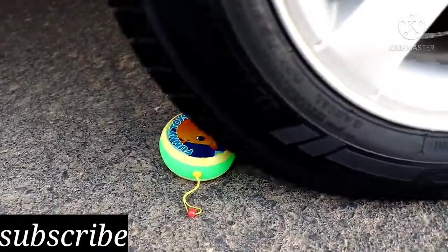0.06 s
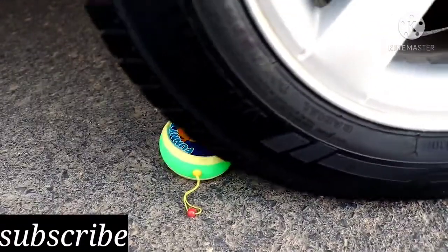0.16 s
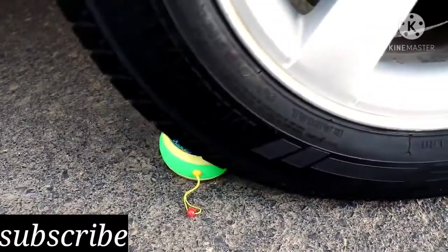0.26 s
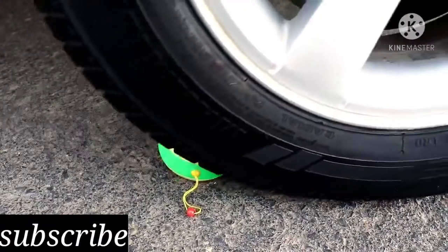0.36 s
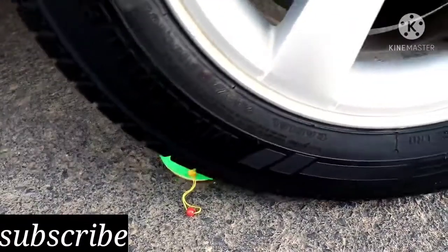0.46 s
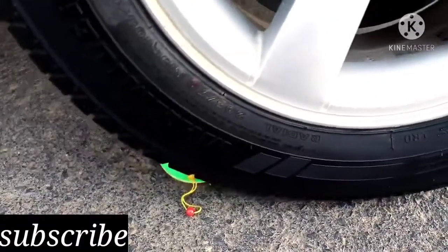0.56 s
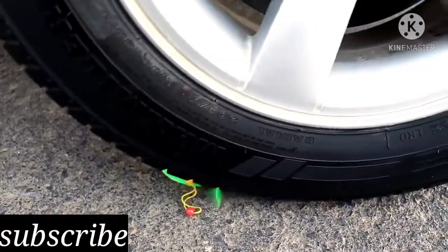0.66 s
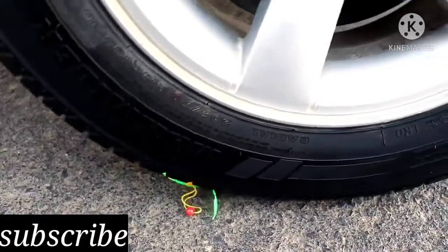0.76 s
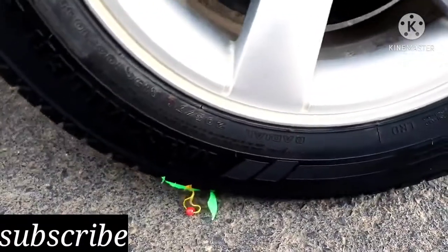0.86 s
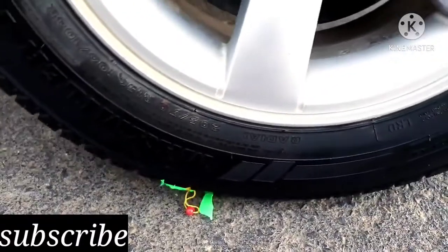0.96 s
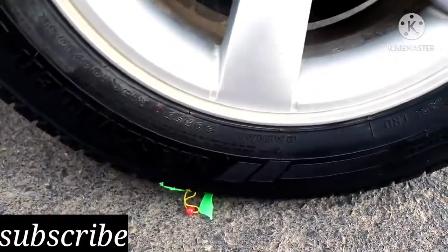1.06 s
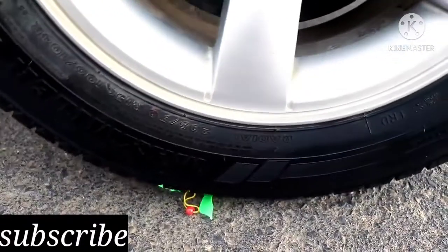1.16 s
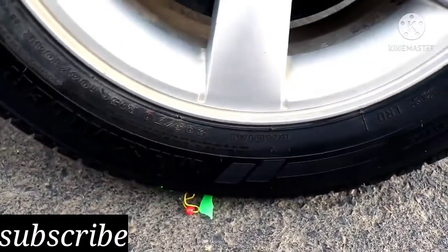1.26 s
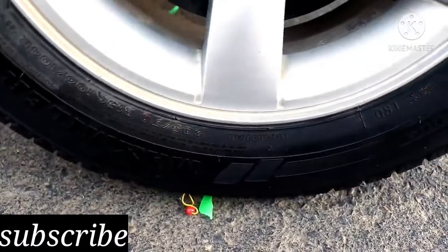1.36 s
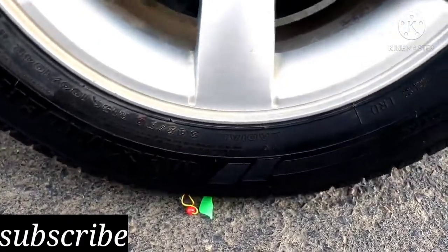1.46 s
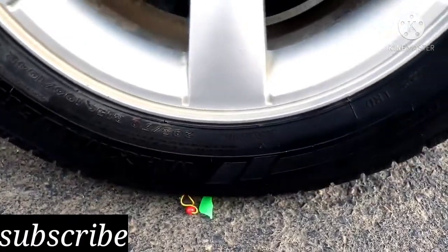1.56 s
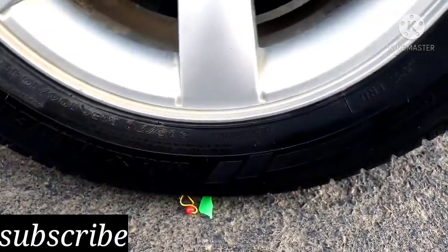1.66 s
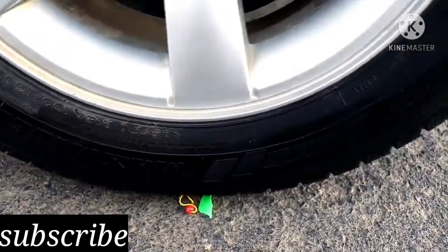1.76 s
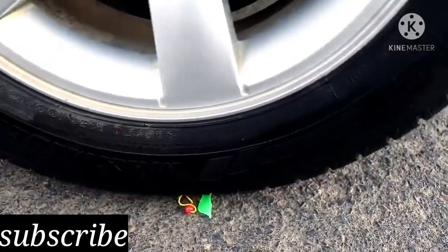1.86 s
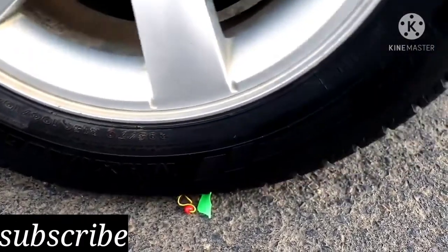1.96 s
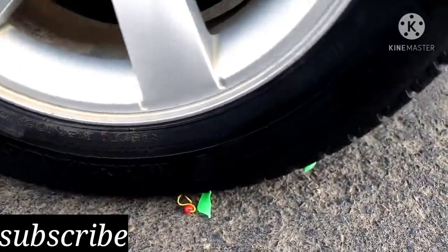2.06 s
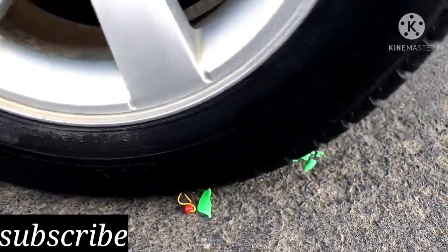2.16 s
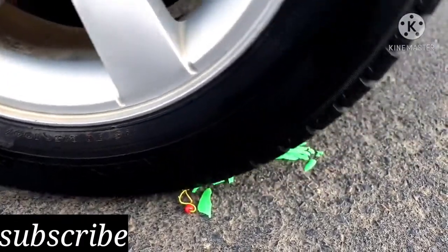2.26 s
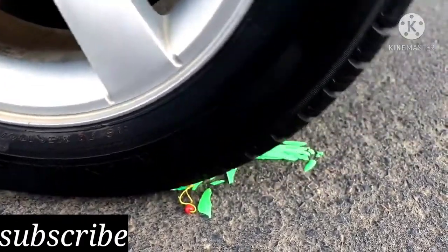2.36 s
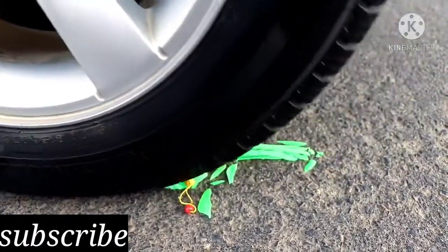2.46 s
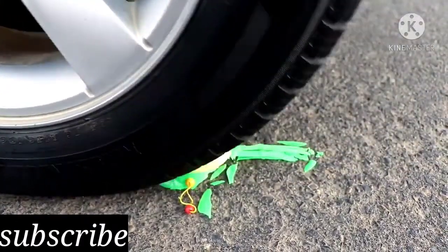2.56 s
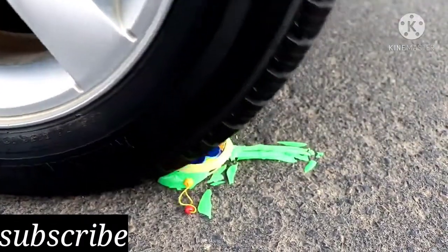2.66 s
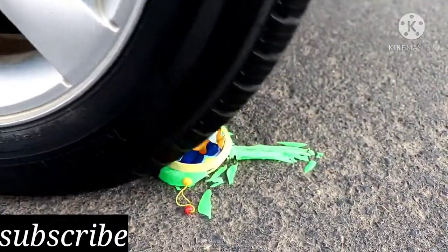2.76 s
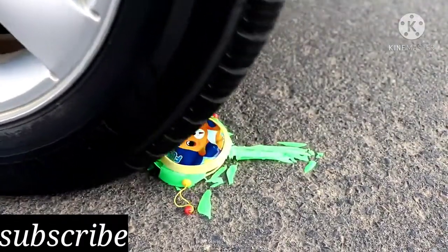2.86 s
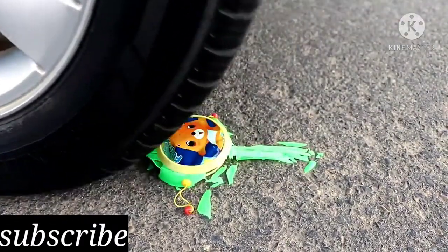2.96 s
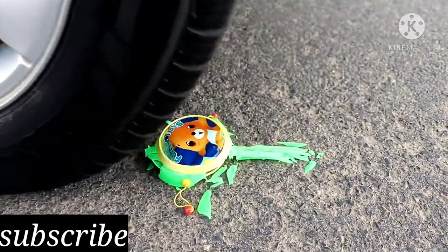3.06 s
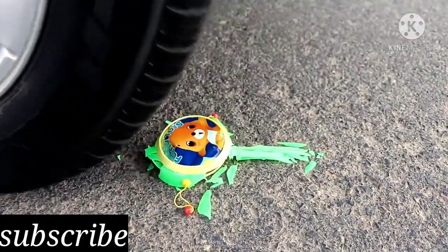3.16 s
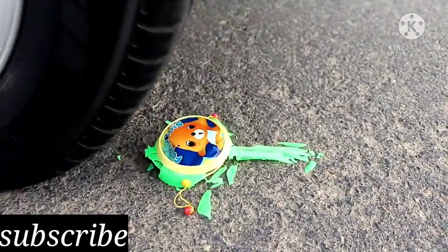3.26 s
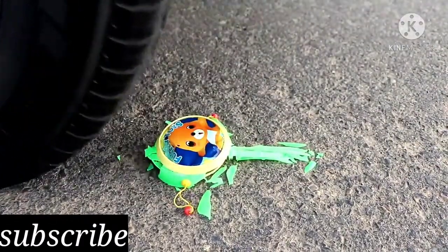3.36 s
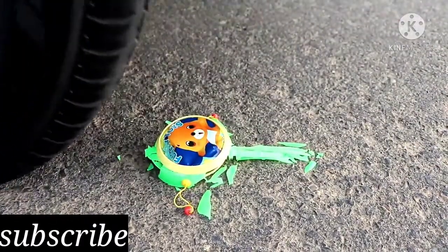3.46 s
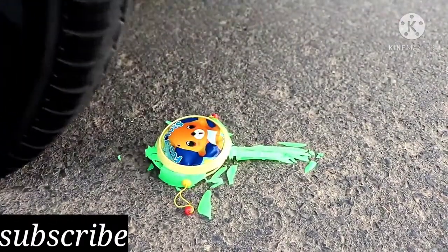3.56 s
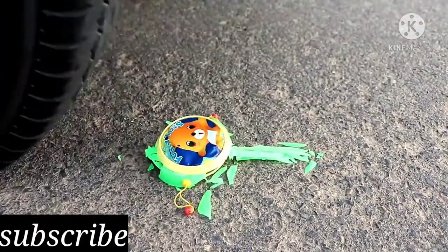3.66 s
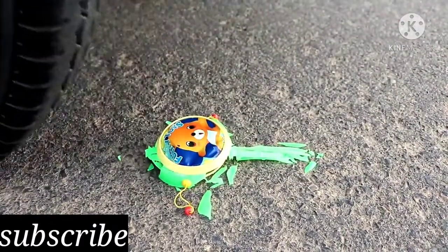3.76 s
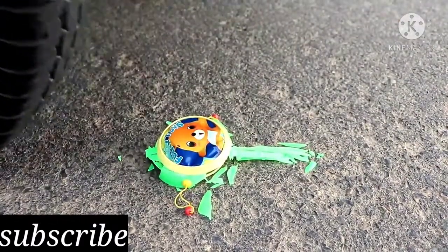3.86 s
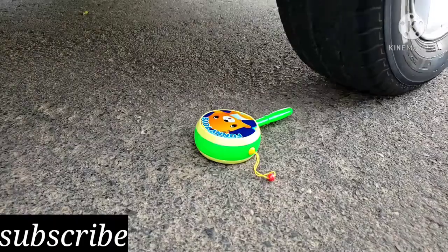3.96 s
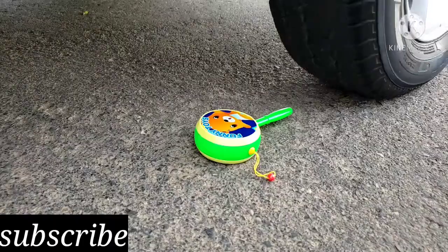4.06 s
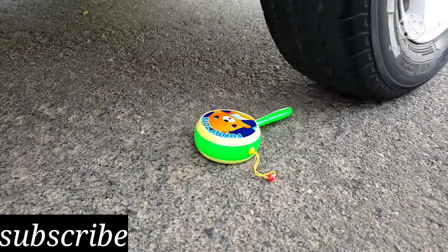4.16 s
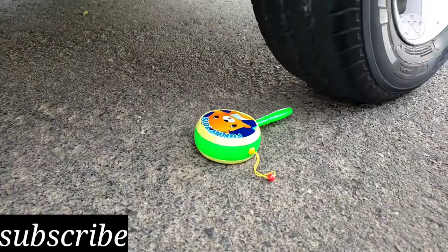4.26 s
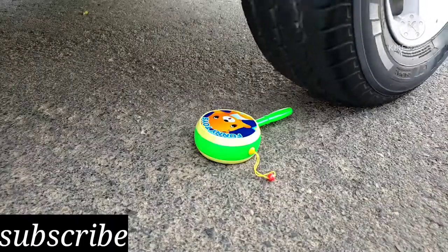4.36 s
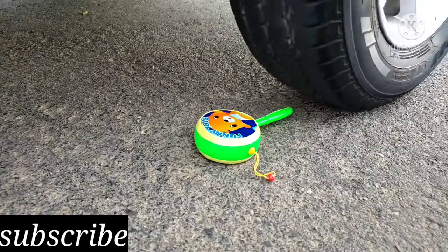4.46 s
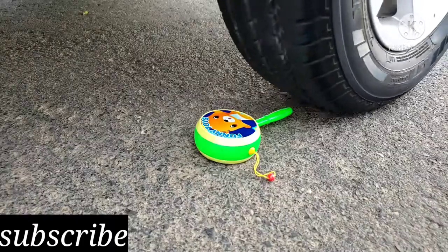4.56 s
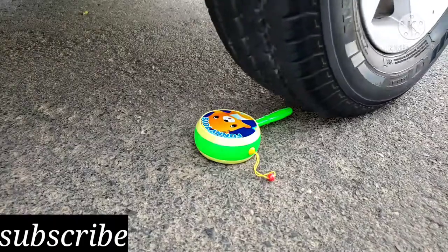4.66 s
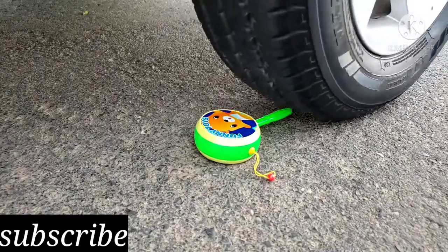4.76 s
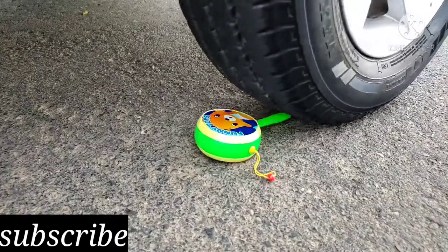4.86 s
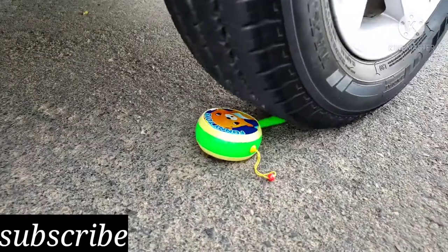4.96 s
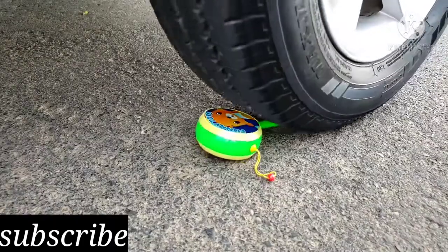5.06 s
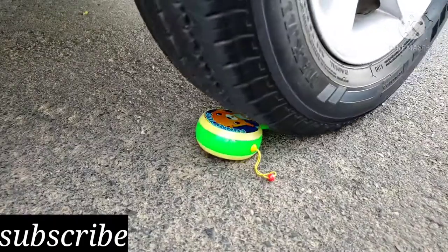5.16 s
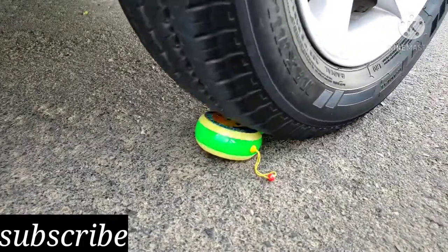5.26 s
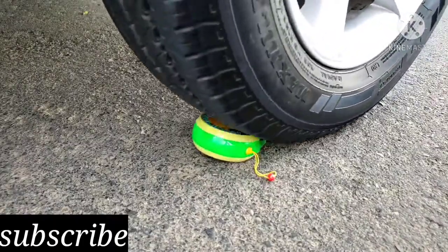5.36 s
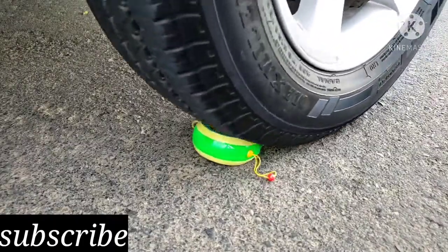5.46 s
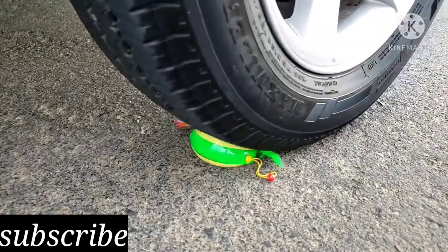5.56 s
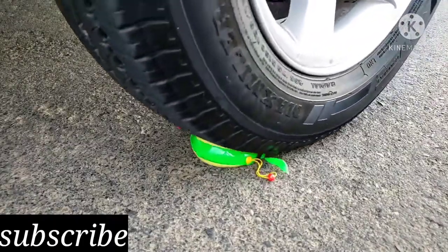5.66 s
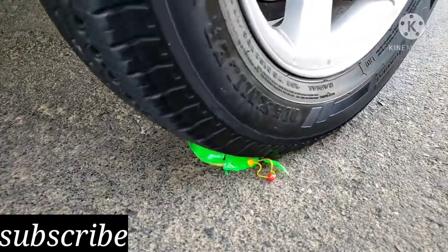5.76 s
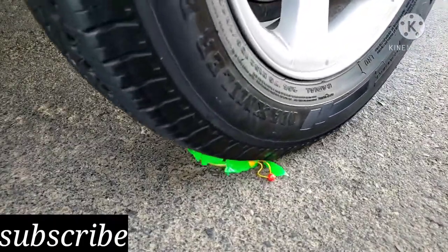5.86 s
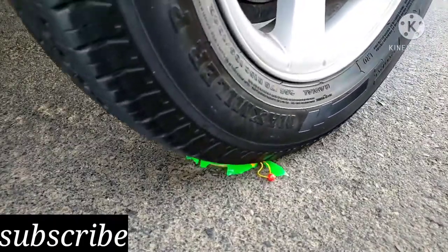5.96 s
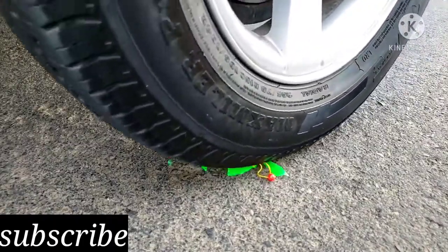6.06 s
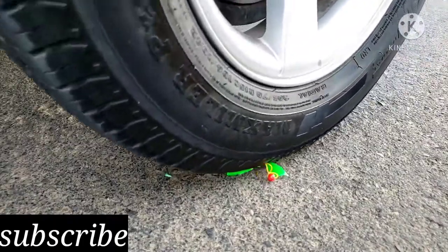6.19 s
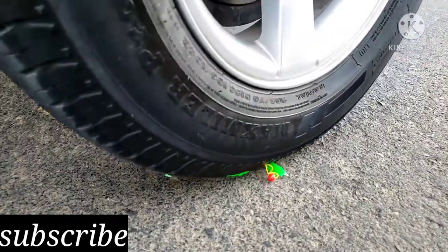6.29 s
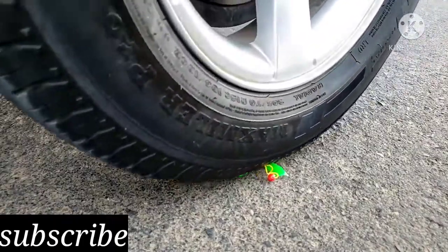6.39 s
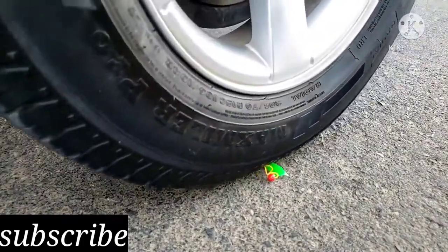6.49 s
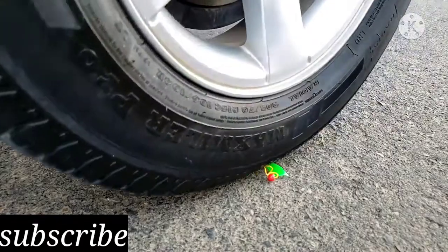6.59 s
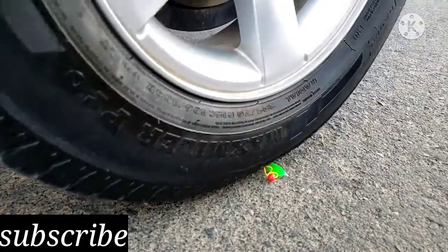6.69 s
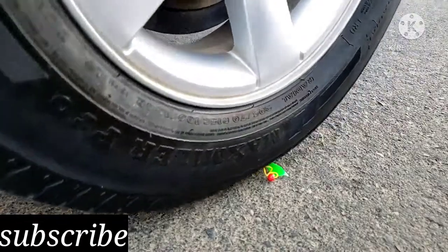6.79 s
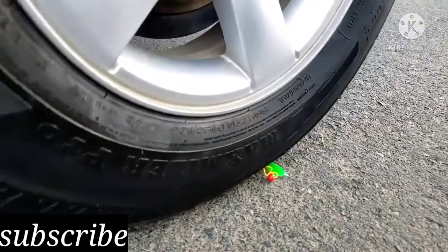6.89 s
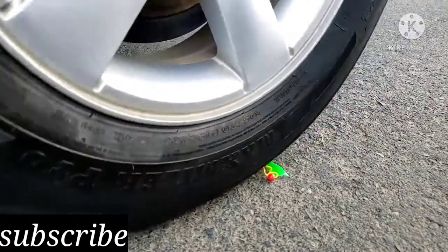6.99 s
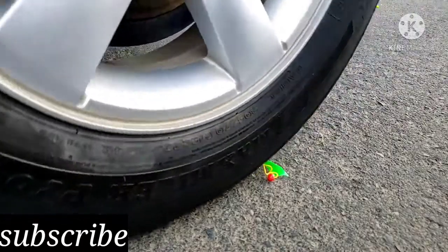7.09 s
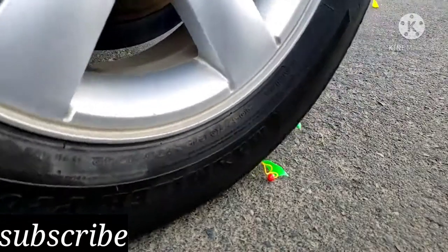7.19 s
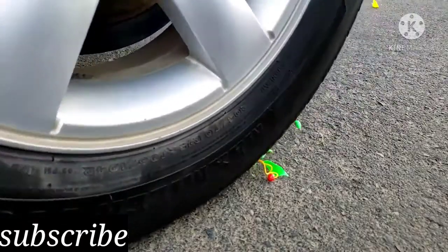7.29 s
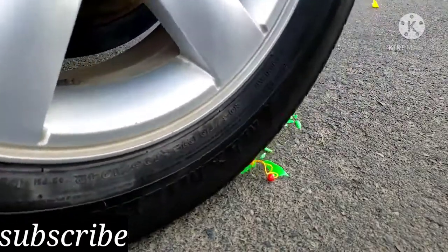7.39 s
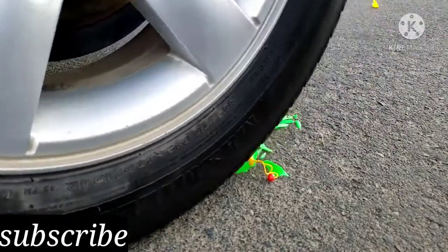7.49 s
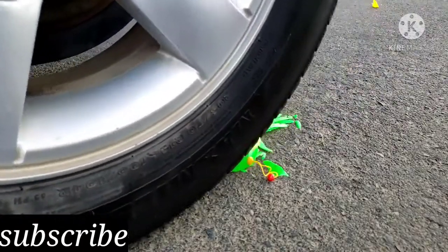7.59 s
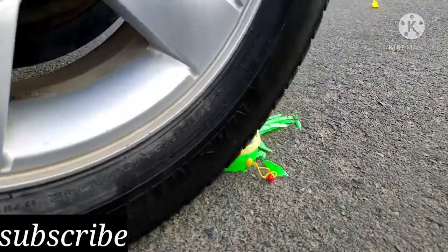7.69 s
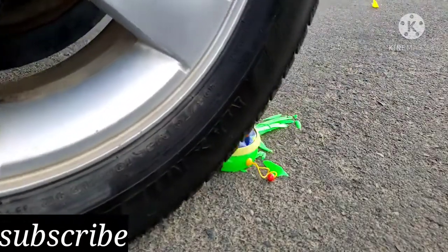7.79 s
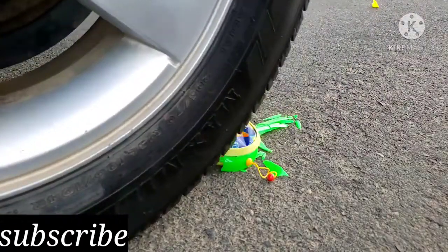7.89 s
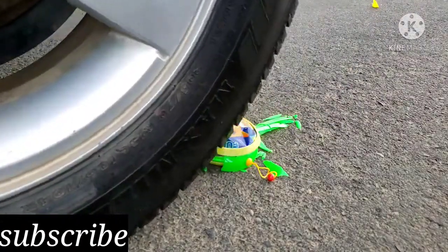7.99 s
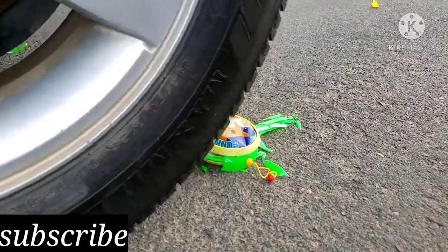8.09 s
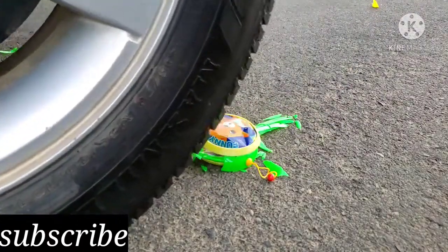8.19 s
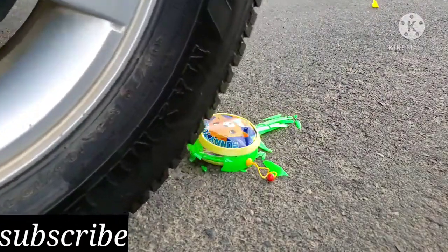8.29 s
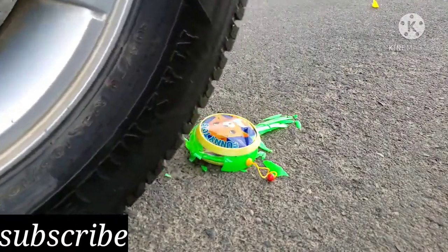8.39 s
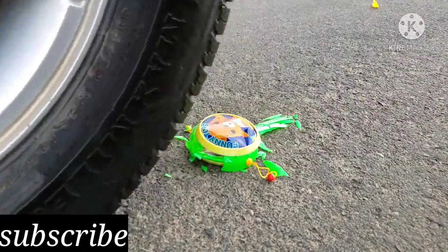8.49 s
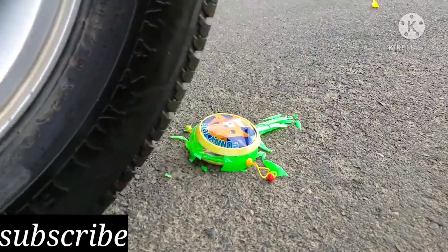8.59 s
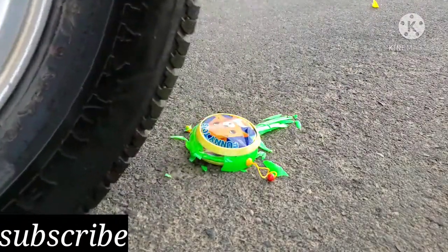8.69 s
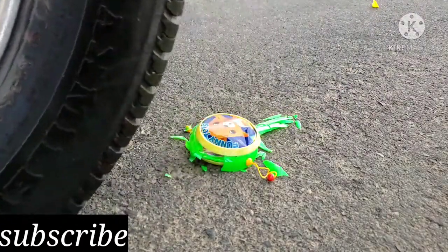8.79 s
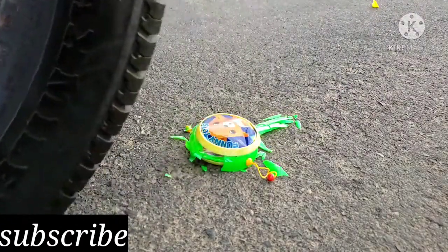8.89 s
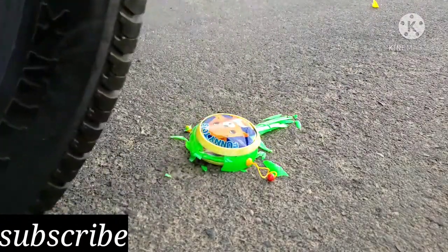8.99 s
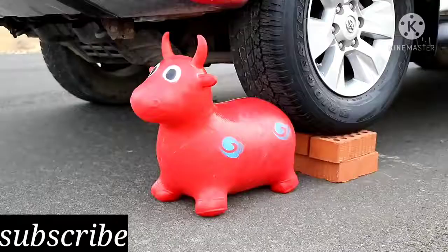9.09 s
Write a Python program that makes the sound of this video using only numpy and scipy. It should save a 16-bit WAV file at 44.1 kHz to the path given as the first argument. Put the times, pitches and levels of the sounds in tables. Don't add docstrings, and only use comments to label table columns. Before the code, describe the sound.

A close, dry outdoor phone pickup on asphalt, with a quiet, low engine idle and faint hiss throughout. At about 0.2 seconds a tyre starts crushing a hollow plastic toy: dense, uneven brittle cracks, bright snaps, hollow mid-pitched clacks and short thumps, with splinters grinding between them. The loud barrage lasts until about 1.5 seconds, then spaces out into single snaps until about 2.1. Light ticks, small springing splinters and a dusty fizz fade by about 3, leaving the engine. At 4 seconds there is a sudden scene change and a second of idling. The same crush returns at 5 seconds, slightly quieter, densest from 5.1 to 6.3, with sparser breaks to 7. A faint whine rises around 7 as tiny chips tick and rubber peels softly away. From about 7.9 to 9.1 only the low idle remains.

```python
import sys
import numpy as np
from scipy import signal
from scipy.fft import rfft, irfft
from scipy.io import wavfile
from scipy.ndimage import uniform_filter1d

SR = 44100
rng = np.random.default_rng(int(sys.argv[2]) if len(sys.argv) > 2 else 0)


def level_to_linear(level):
    exponent = np.asarray(level, float) / 20
    return 10 ** exponent


def log_audio(samples):
    frames = np.atleast_2d(samples).T
    limited = np.clip(frames, -1, 1)
    pcm = np.round(limited * 32767).astype(np.int16)
    wavfile.write(sys.argv[1], SR, pcm)


N = 403074
CUT_S = 3.97

# (frequency [Hz], width [Hz], level [dB])
SHELL = [(40, 50, -11), (90, 16, 0), (205, 90, -0.5), (256, 40, 2.5), (296, 45, -1.5), (357.7, 80.3, 5),
         (445.2, 160, -1.5)]


def cracks():
    # (time [s], snap level [dB], piece level [dB], piece pitch [Hz], thump level [dB])
    handle = [(5.0164, -38, -51.5, 3070, -51), (5.038, -15.5, -18, 3590, -27),
              (5.079, -9, -9.5, 2690, -20.5), (5.1002, -26, -19.5, 3480, -33),
              (5.1365, -18, -26, 3110, -44.5), (5.1524, -25.5, -22, 974, -36.5),
              (5.1617, -13, -15.5, 1496, -24.5), (5.1743, -20.5, -16.5, 3410, -33.5),
              (5.1921, -23.5, -24.5, 837, -46.5), (5.2106, -12, -14, 880, -29.5),
              (5.24, -39, -44.5, 3660, -43.5), (5.2556, -16.5, -14, 1410, -31.5),
              (5.2724, -14, -15.5, 1270, -32.5), (5.2839, -19, -17.5, 760, -35),
              (5.29, -26, -7.5, 1376, -24), (5.2939, -8.5, -12.5, 2442, -31),
              (5.3019, -18.5, -15, 1434, -20.5), (5.3116, -24, -20.5, 1440, -39),
              (5.324, -22.5, -22.5, 1400, -43), (5.3466, -16.5, -20.5, 1220, -33.5),
              (5.3529, -31, -14, 835, -31), (5.366, -9.5, -19, 2378, -30), (5.385, -12, -10, 1382, -22),
              (5.4, -42.5, -26.5, 859, -29)]
    rim = [(5.4108, -8, -14, 1890, -22.5), (5.4164, -20.5, -21.5, 2500, -28.5),
           (5.4289, -28, -21, 2453, -34.5), (5.4471, -18.5, -6.5, 1259, -12.5),
           (5.4572, -7, -11.5, 2537, -16.5), (5.4698, -12.5, -20.5, 864, -27.5),
           (5.4835, -22.5, -19, 2353, -32), (5.4881, -20.5, -30, 2500, -35), (5.5059, -22, -32, 2150, -37),
           (5.526, -19, -25, 1506, -29), (5.5401, -13, -4.5, 1462, -22.5), (5.55, -13.5, -19.5, 853, -19),
           (5.5657, -18.5, -21, 2417, -24.5), (5.572, -17, -14, 720, -16.5), (5.5773, -9, -9, 800, -21.5),
           (5.6025, -12.5, -16, 1430, -29), (5.6334, -27, -28.5, 2397, -28.5),
           (5.6404, -25.5, -25.5, 2105, -32.5), (5.6714, -13.5, -6, 1384, -16),
           (5.6779, -21.5, -14.5, 1128, -33), (5.685, -44, -23, 1303, -29.5),
           (5.7278, -12.5, -9.5, 2930, -16), (5.7453, -31.5, -27, 729, -32)]
    collapse = [(5.765, -10.5, -11.5, 2552, -15.5), (5.775, -18, -11.5, 1374, -30),
                (5.7922, -19, -16.5, 1713, -22), (5.8006, -31, -17, 3000, -29.5),
                (5.8151, -28, -25.5, 2730, -41.5), (5.8449, -31.5, -27.5, 2720, -30),
                (5.854, -20.5, -14, 1197, -16.5), (5.8658, -28, -15, 1400, -32.5),
                (5.8745, -24.5, -27.5, 993, -41.5), (5.9175, -35, -42, 907, -46),
                (5.926, -31, -26.5, 2720, -51.5), (5.965, -20.5, -19, 1420, -34),
                (5.9863, -6, -7, 2000, -14), (6.01, -18, -19, 1700, -24), (6.0538, -42.5, -47, 780, -13),
                (6.0657, -19.5, -10.5, 1325, -26.5), (6.0755, -29.5, -22, 2252, -41),
                (6.0849, -15.5, -13.5, 1680, -13.5), (6.1011, -14.5, -15.5, 3340, -31),
                (6.1544, -19, -28.5, 2132, -35.5), (6.2205, -13, -12.5, 1847, -19),
                (6.239, -52, -32.5, 809, -33.5), (6.2755, -21.5, -21.5, 2360, -28.5),
                (6.2902, -15, -22, 1455, -26)]
    settling = [(6.3235, -57, -36, 2666, -40), (6.3325, -28, -23, 2620, -33), (6.357, -15, -18, 913, -24.5),
                (6.4027, -32, -29.5, 2670, -38), (6.4329, -22.5, -15.5, 927, -27.5),
                (6.454, -27, -33, 1700, -50), (6.49, -44, -50, 1650, -52),
                (6.5198, -22.5, -20.5, 2383, -25), (6.5265, -32, -29, 1127, -45),
                (6.569, -27.5, -26, 2660, -33), (6.6217, -21.5, -17.5, 977, -26.5),
                (6.6836, -34.5, -43, 1250, -45), (6.7042, -19, -15, 2780, -29),
                (6.7233, -32, -28.5, 900, -39), (6.7454, -26, -23.5, 2680, -32.5),
                (6.7693, -27, -22, 3300, -37.5), (6.8094, -38, -49, 1390, -56.5),
                (6.8434, -32.5, -34.5, 930, -47.5), (6.8551, -37, -43.5, 2730, -60),
                (6.8915, -16, -10, 882, -19.5), (6.8981, -48, -13.5, 886, -44.5),
                (6.9345, -26, -26.5, 3570, -37), (6.9722, -41, -48, 2480, -56),
                (6.9815, -35.5, -60, 1340, -50)]
    # (time [s], snap level [dB], piece level [dB], piece pitch [Hz])
    loose_chips = [(7.0085, -47, -53, 850), (7.0279, -31.5, -38, 2300), (7.0596, -38, -39.5, 2800),
                   (7.0946, -35, -55, 3550), (7.1181, -37.5, -44.5, 2240), (7.1415, -54, -44, 2760),
                   (7.1556, -45.5, -42, 2570), (7.1676, -34, -57, 2070), (7.1812, -30.5, -41, 2500),
                   (7.1973, -60, -53, 2500), (7.2181, -30, -31.5, 2600), (7.2476, -28, -20, 3030),
                   (7.268, -45.5, -31.5, 1340), (7.2871, -30.5, -30, 2500), (7.3144, -51, -53, 1320),
                   (7.365, -49, -60, 1300), (7.391, -45, -44.5, 1300), (7.4013, -53, -46, 1320),
                   (7.4131, -42, -59, 3020), (7.4296, -37, -38.5, 1780), (7.4471, -54.5, -52, 3020),
                   (7.4607, -39.5, -50, 1350), (7.5005, -57, -44, 1310), (7.5442, -61, -49, 1150),
                   (7.6119, -47.5, -64, 1710), (7.6398, -47.5, -51, 1420), (7.6583, -49.5, -58, 1350),
                   (7.686, -59, -61, 3260), (7.7185, -53, -54, 2050), (7.9119, -58, -75, 1400)]
    # (frequency [Hz], density [dB/Hz])
    snap_spectrum = [(1760, -10), (3000, 5.5), (5140, -6.5), (6220, -6.5), (10500, -7.5), (14600, -10),
                     (15500, -18), (16300, -32.5)]
    # (frequency [Hz], width [Hz], level [dB])
    wall = [(780, 180, 2), (1085, 250, 6.5), (1400, 240, 4), (2050, 860, 3.5), (2500, 600, -25.5),
            (3130, 540, -9.5)]
    late_s, late_db = 6.95, -14
    ticks = [(*row, row[2] - 12) for row in loose_chips]
    stages = [(handle, 0.087), (rim, 0.069), (collapse, 0.061), (settling, 0.05), (ticks, 0.05)]
    breaks = [(*row, t60) for rows, t60 in stages for row in rows]

    t = np.arange(2800) / SR
    onset = (1 - np.exp(-t / 0.00015)) * (1 - t / t[-1])
    rupture = level_to_linear(6 - 60 * t / 0.0048) + level_to_linear(5 - 60 * t / 0.029)
    snap, piece, thump = np.zeros((3, 2, N + len(t)))
    for s, snap_db, piece_db, hz, thump_db, t60 in breaks:
        i = int(s * SR)
        span = slice(i, i + len(t))
        shape = (rupture + level_to_linear(-60 * t / (2.11 * t60))) * onset
        burst = grit((2, len(t)), 1.8, 0.5) * shape
        chip_hz = 5900 * 2 ** (1.2 * rng.random(3))
        chips = sum(ring(burst, f, f / 6) for f in chip_hz)
        snap[:, span] += opening(burst + 2 * chips, snap_db - 0.5)
        other_hz = hz * 2.8 if hz < 1500 else hz / 2.3
        plate = ring(burst, hz, hz / 9.4) + level_to_linear(-17) * ring(burst, other_hz, other_hz / 1.5)
        piece[:, span] += opening(plate + level_to_linear(-9.5) * body(burst, wall), piece_db - 6.5)
        sides = np.array([[1], [0.8 * rng.standard_normal()]])
        push = body(burst + 14 * sides * np.exp(-t / 0.00033), SHELL)
        push_db = min(thump_db, piece_db) + late_db * (s > late_s)
        push_db -= 6.5 + 1.2 * max(-32 - thump_db, 0)
        thump[:, span] += opening(push, push_db)
    bright = np.array([colour(x, snap_spectrum) for x in snap])
    return (bright + piece + thump)[:, :N]


def grind():
    # (time [s], level [dB], load on the shell [dB])
    pressed = [
        (5.0, -52.5, 5),
        (5.15, -29.5, -2.5),
        (5.3, -31, -10.5),
        (5.6, -31, -1),
        (5.85, -41.5, 1.5),
        (6.05, -45, 3),
        (6.3, -50.5, 9),
        (6.6, -49, 4),
        (6.9, -55, 5),
    ]
    # (time [s], level [dB], load on the shell [dB])
    release = [
        (7.1, -48.5, -18),
        (7.27, -44, -15.5),
        (7.33, -63.5, 13),
        (7.45, -48, -32),
        (7.6, -67, 7),
        (7.72, -69, 4),
        (7.8, -75, 5),
    ]
    # (frequency [Hz], density [dB/Hz])
    crunch = [(180, -30), (300, 1), (595, -13.5), (778, -11), (1440, 0.5), (5150, -15), (10600, -31.5),
              (14500, -14.5), (16300, -42.5)]
    db, load_db = curve(pressed + release)
    t = np.arange(N) / SR
    rolling = (t > pressed[0][0]) & (t < release[-1][0])
    out = np.zeros((2, N))
    for hz, share in ((9500, 0.94), (5140, 0.06), (2200, 0.22), (800, 0.95)):
        slips = decaying(grit(N, 2.5, 150 / SR), 0.003)
        clicks = rng.standard_normal((2, N)) * (slips + 0.11 * slips.mean())
        out += band(level(clicks, 0) * level_to_linear(share * load_db), hz / 1.2, hz * 1.4)
    groan = level(body(rng.standard_normal((2, N)), SHELL), -12) * level_to_linear(load_db + 3 * walk(40))
    crushed = np.array([colour(x, crunch) for x in out])
    return rolling * level_to_linear(db + 2) * (crushed + groan)


def fizz():
    # (time [s], level [dB])
    peeling = [
        (6.9, -68.5),
        (7.25, -53.5),
        (7.45, -59.5),
        (7.7, -58),
        (7.78, -79.5),
    ]
    db, = curve(peeling)
    slips = decaying(grit(N, 2, 220 / SR), 0.002)
    dust = rng.standard_normal((2, N)) * (slips + 0.6 * slips.mean()) * level_to_linear(db + 2.2 * walk(20))
    dust = band(dust / np.sqrt(np.mean(slips ** 2)), 5600, 12500)
    return dust * (np.arange(N) / SR > peeling[0][0])


def engine():
    # (time [s], level [dB])
    passing = [
        (4.0, -56.5),
        (4.95, -52.5),
        (7.9, -52),
        (9.14, -53),
    ]
    # (time [s], level [dB])
    whining = [
        (4.0, -71.5),
        (5.0, -73),
        (6.9, -61),
        (7.3, -62.5),
        (7.8, -70.5),
        (9.14, -89),
    ]
    # (frequency [Hz], width [Hz], level [dB])
    exhaust = [(25.4, 6, -8), (51, 8, -11), (75, 5.5, 2), (100, 7, -3), (113, 8, 0), (250, 20, -14)]
    # (frequency [Hz], density [dB/Hz])
    bay_spectrum = [(71, -37.5), (120, -1.5), (254, -8.5), (301, -9.5), (504, -14.5), (537, -16.5),
                    (745, -15.5), (884, -16.5), (1680, -12), (1840, -13.5), (5000, -33.5), (6500, -71.5),
                    (11000, -120)]
    # (frequency [Hz], width [Hz], level [dB])
    bay_rings = [(605, 49, -16.5), (1163, 14, -15), (1656, 24, -8), (2320, 30, -20), (5324, 11, -30.5)]
    # (frequency [Hz], density [dB/Hz])
    hiss_spectrum = [(1760, -22.5), (3000, 3), (3280, -1.5), (4200, -26), (5760, -11), (6430, -11.5),
                     (12300, -14), (15500, -27.5)]
    # (frequency [Hz], left-right correlation [-1 to 1])
    engine_likeness = [(25, 0.45), (60, 0.97), (150, 0.98), (400, 0.93), (1400, 0.27), (3000, .02)]
    t = np.arange(N) / SR
    exhaust_db, = curve(passing)
    whine_db, = curve(whining)
    bay_db = -56 - 0.76 * (t - CUT_S)
    hiss_db = -64.5 - 1.7 * (t - CUT_S)

    firing_hz = 24.33
    phase = np.cumsum(firing_hz * (1 + 0.003 * walk(3))) / SR
    cycle = phase.astype(int)
    count = cycle[-1] + 1
    size = level_to_linear(1.5 * rng.standard_normal(count) - 7 * (np.arange(count) % 2))
    firings = np.diff(cycle, prepend=0) * size[cycle]
    boom = level(sum(level_to_linear(db) * ring(ring(firings, f, w), f, w) for f, w, db in exhaust), 0)

    noise = rng.standard_normal((4, 2, N)) * (1 + 0.2 * np.cos(2 * np.pi * phase))
    bay = level(np.array([colour(x, bay_spectrum) for x in noise[0]]), 0)
    bay = bay + level(body(noise[1], bay_rings), -5.5)
    hiss = level(np.array([colour(x, hiss_spectrum) for x in noise[2]]), 0)
    whine = level(ring(noise[3], 615, 14), 0)

    centre = np.array([[1], [0]])
    pair = level_to_linear(exhaust_db) * centre * boom + level_to_linear(bay_db) * bay
    pair = pair + level_to_linear(hiss_db) * hiss + level_to_linear(whine_db) * whine
    left, right = ports(pair, engine_likeness, [(100, 0.3), (5000, 0.3)])
    return np.array([left, np.roll(right, 8)])


def grit(shape, spread_db, share):
    size = level_to_linear(spread_db * np.minimum(rng.exponential(size=shape), 4))
    clicks = rng.standard_normal(shape) * (rng.random(shape) < share) * size
    return clicks / np.sqrt(np.mean(clicks ** 2))


def decaying(clicks, tau_s):
    return signal.lfilter([1], [1, -np.exp(-1 / (tau_s * SR))], np.abs(clicks))


def ring(x, hz, width):
    return signal.lfilter(*signal.iirpeak(hz, hz / width, SR), x)


def body(x, modes):
    return sum((-1) ** k * level_to_linear(db) * ring(x, f, w) for k, (f, w, db) in enumerate(modes))


def band(x, low_hz, high_hz):
    return signal.sosfilt(signal.butter(2, [low_hz, high_hz], "band", fs=SR, output="sos"), x)


def colour(x, table):
    cep = irfft(on_log(table, np.linspace(0, SR / 2, 1025)) * np.log(10) / 20)
    cep[1:1024] *= 2
    cep[1025:] = 0
    response = irfft(np.exp(rfft(cep)))[:1024]
    return signal.oaconvolve(x, response / np.sqrt(np.sum(response ** 2)))[:len(x)]


def on_log(table, hz):
    f, v = np.transpose(table)
    return np.interp(np.log(hz + 1), np.log(f + 1), v)


def curve(table):
    s, *columns = np.transpose(table)
    return [np.interp(np.arange(N) / SR, s, c) for c in columns]


def walk(rate):
    k = int(SR / rate)
    steps = np.repeat(rng.standard_normal(N // k + 1), k)
    return 1.3 * uniform_filter1d(uniform_filter1d(steps, k), k)[:N]


def level(x, db):
    return x * level_to_linear(db) / np.sqrt(np.mean(x ** 2))


def opening(x, db):
    return x * level_to_linear(db) / np.sqrt(np.mean(x[:, :200] ** 2))


def ports(pair, likeness, tilt):
    hz = np.linspace(0, SR / 2, N // 2 + 1)
    like = np.clip(on_log(likeness, hz), -0.9, 0.99)
    tilt_db = on_log(tilt, hz)
    mid, side = rfft(pair) * np.sqrt([1 + like, 1 - like])
    left = (mid + side) * level_to_linear(tilt_db / 2)
    right = (mid - side) * level_to_linear(-tilt_db / 2)
    return irfft(np.array([left, right]), N)


def scene():
    # (frequency [Hz], left-right correlation [-1 to 1])
    toy_likeness = [(60, 0.12), (250, 1), (600, 0.85), (1200, 0.77), (2500, 0.57), (5000, 0),
                    (12000, 0.0093)]
    # (frequency [Hz], left minus right [dB])
    toy_tilt = [(100, -3), (300, 2), (1000, -0.7), (2500, -0.5), (5000, -4), (9000, -2), (13000, -4)]
    whole = ports(cracks() + grind() + fizz(), toy_likeness, toy_tilt) + engine()
    cut, lag = int(CUT_S * SR), 213394
    first = level_to_linear(1.86) * whole[:, lag:lag + cut]
    return np.concatenate([first, whole[:, cut:]], axis=1)


def band_limit(x):
    return signal.sosfilt(signal.butter(12, 16470, fs=SR, output="sos"), x)


def record(dry):
    ceiling, top_hz = 0.86, 16000
    soft = ceiling * np.tanh(dry / ceiling)
    mix = signal.sosfilt(signal.ellip(8, 0.2, 60, top_hz, fs=SR, output="sos"), soft)
    return band_limit(mix)


dry = scene()
out = record(dry)
log_audio(out)
```